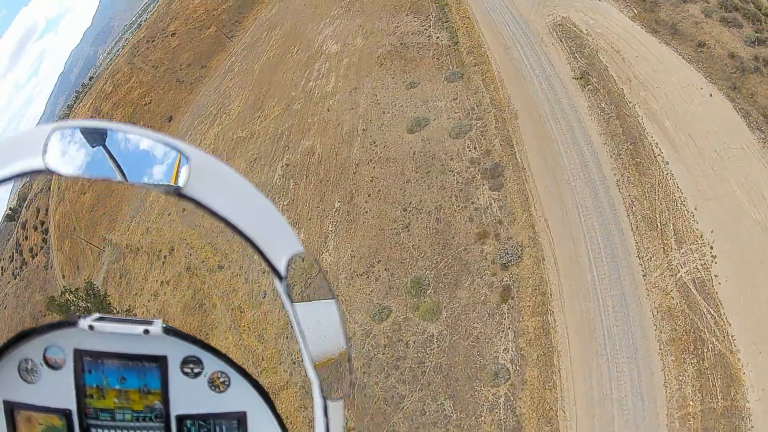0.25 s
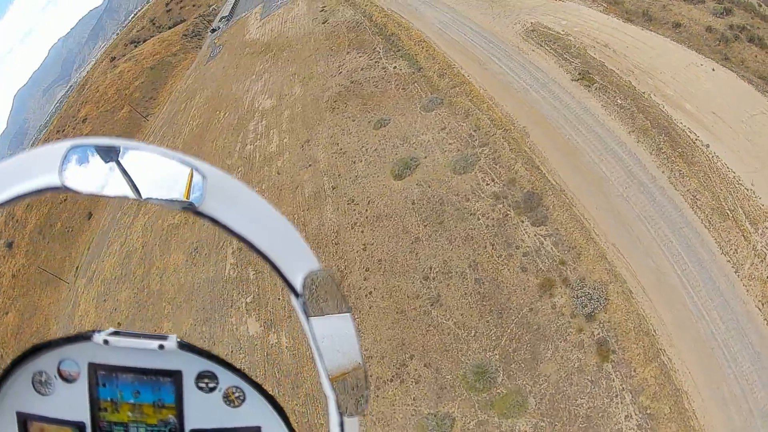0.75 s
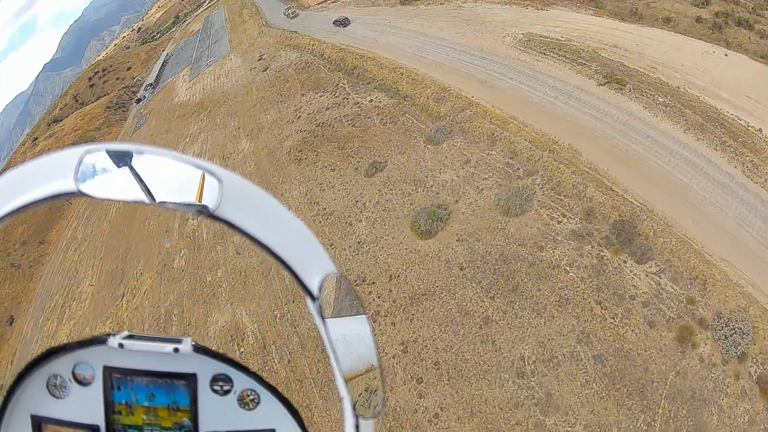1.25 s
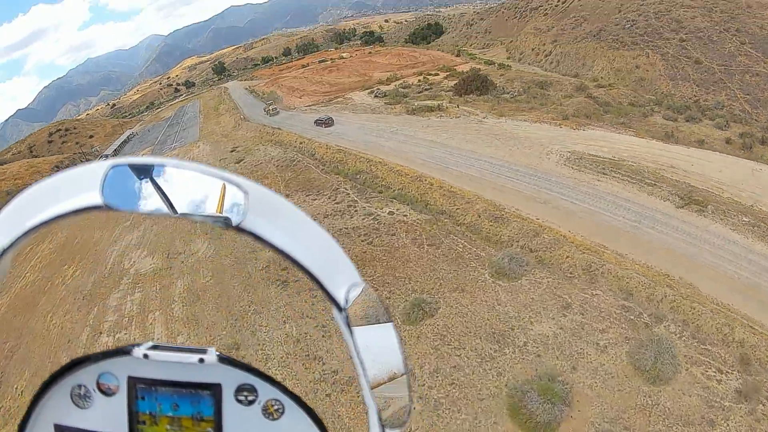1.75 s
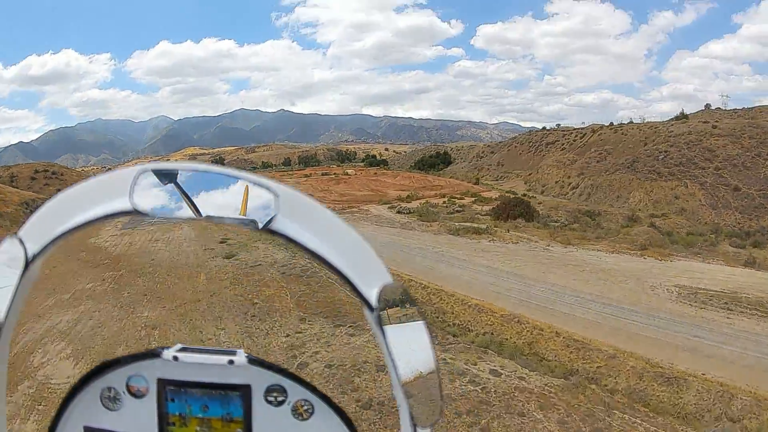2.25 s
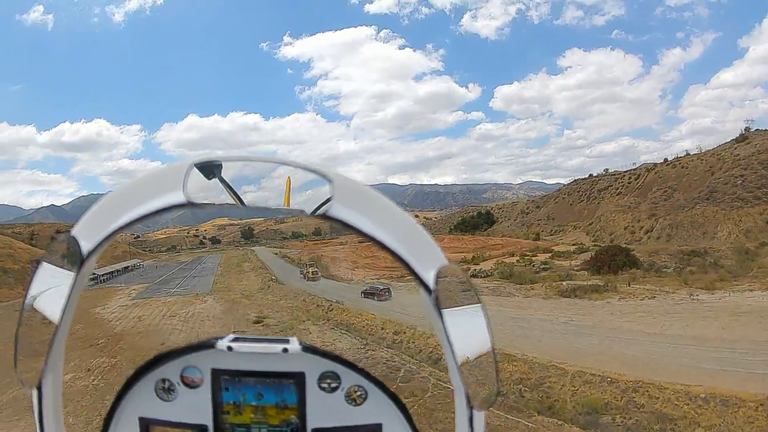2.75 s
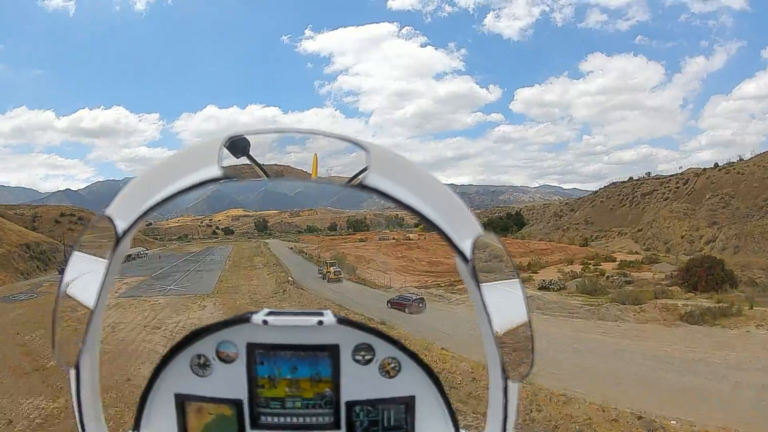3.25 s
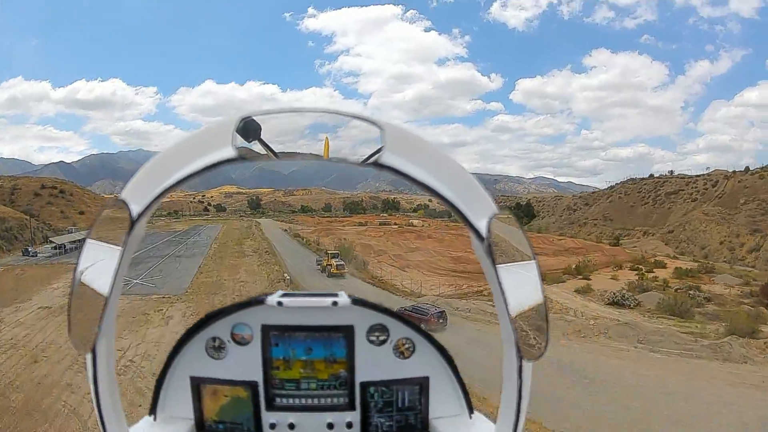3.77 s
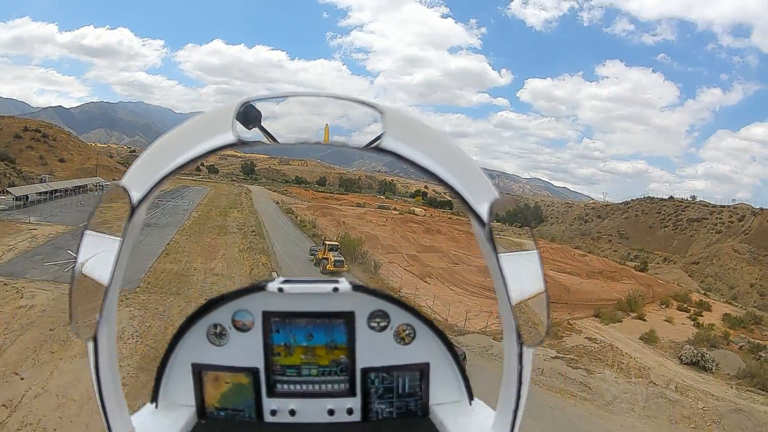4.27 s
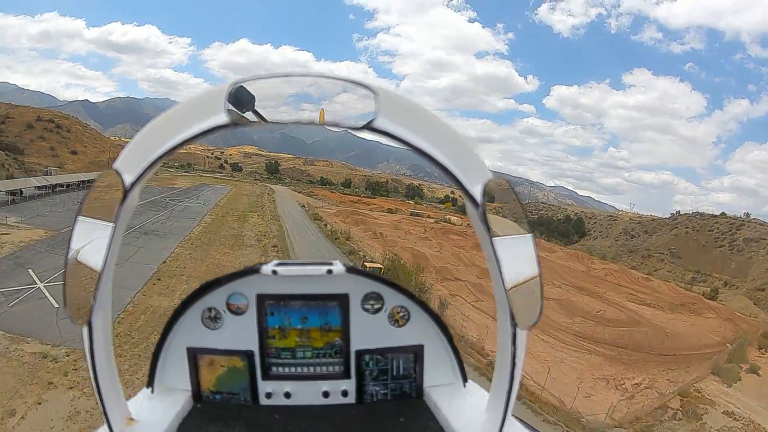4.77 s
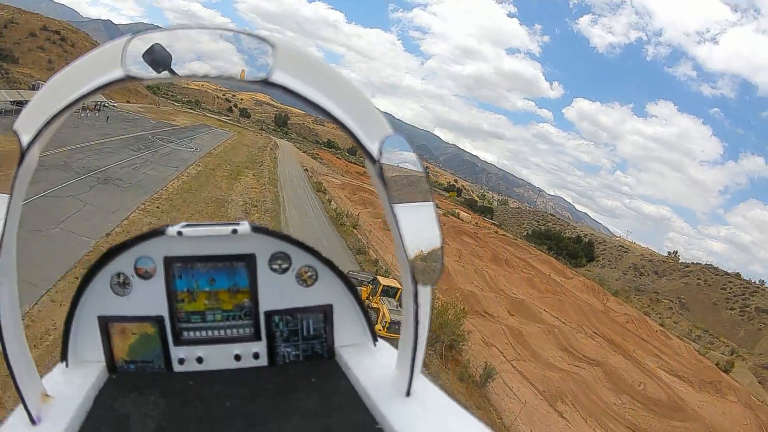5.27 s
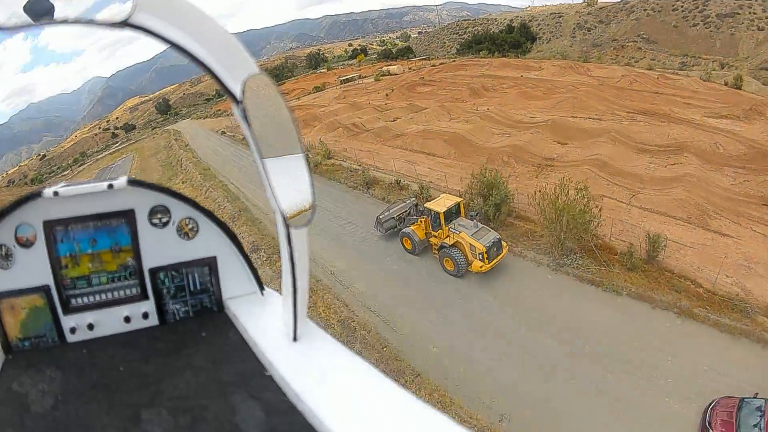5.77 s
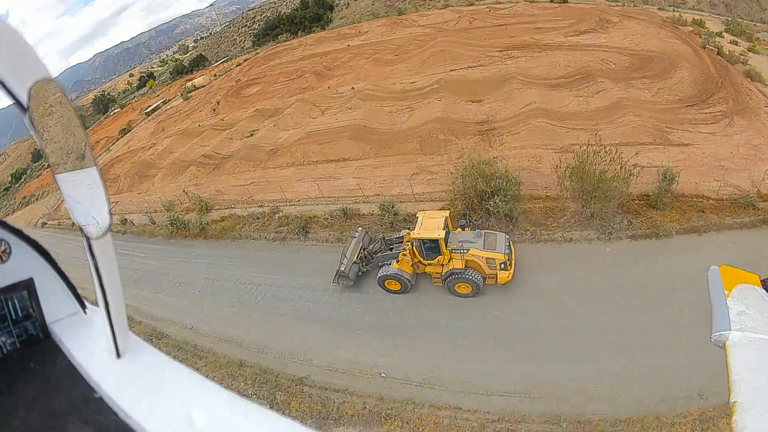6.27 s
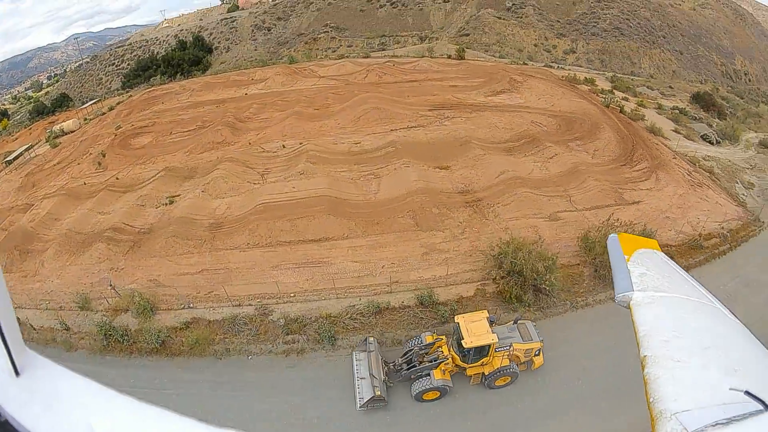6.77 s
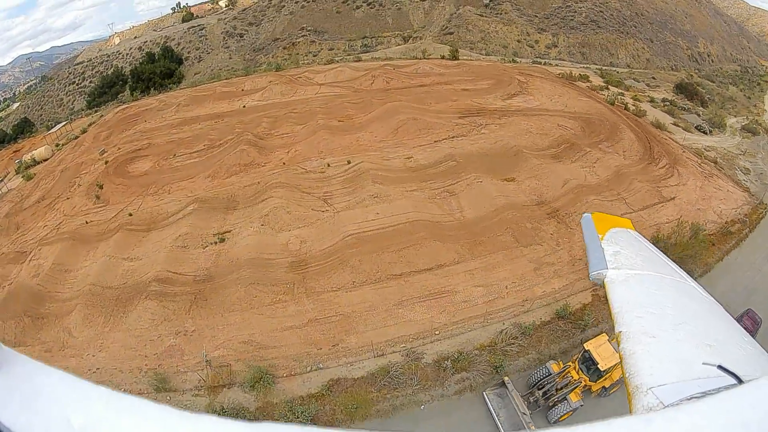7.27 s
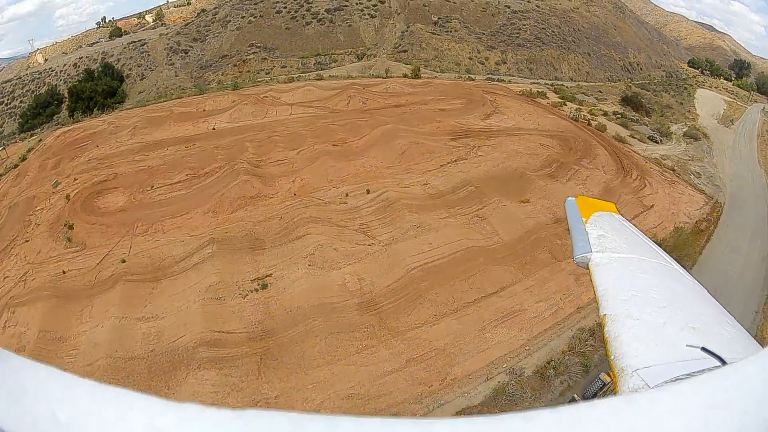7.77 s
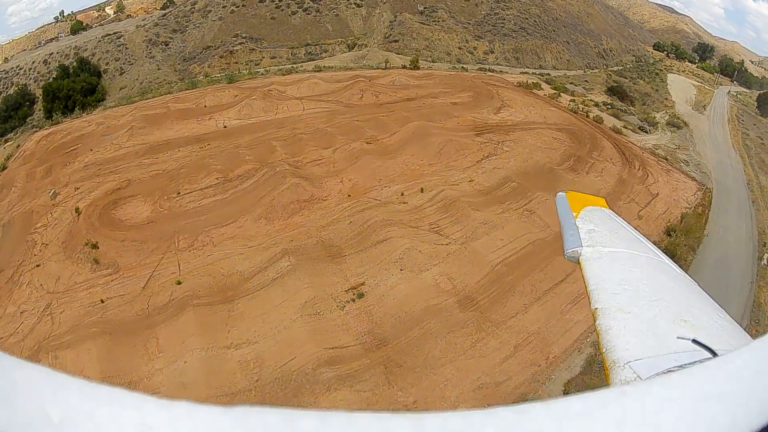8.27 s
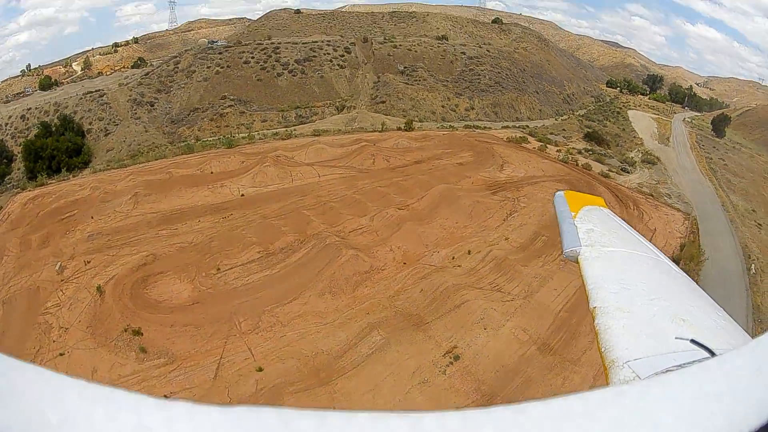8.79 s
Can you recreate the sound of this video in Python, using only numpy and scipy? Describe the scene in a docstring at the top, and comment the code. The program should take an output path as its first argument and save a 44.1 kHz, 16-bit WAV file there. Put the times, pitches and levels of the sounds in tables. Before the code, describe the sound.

A model jet's electric ducted fan is heard in flight from inside the cockpit: a steady mid-pitched hum with a faint high whine above it. Air rushes past throughout, with low buffeting and a thin hiss. The pitch holds for about 1.5 seconds, then creeps upward until 3 seconds, with a slight dip near 3.8. A loose part gives faint, scattered ticks from about 2.5 seconds, mostly between 4 and 5. At around 5 seconds the throttle eases and the pitch falls, lowest near 5.5. It sweeps back up by 6.2 seconds, and the fan grows louder, stepping higher again just after 7. From about 7.5 seconds a light, sputtering, buzzy rattle joins the brighter tone. The pitch rises once more at the end, around 9 seconds, as the rattle fades.

```python
"""Ducted-fan model jet, from the cockpit.

In flight, the electric fan's unbalanced rotor hums through the foam airframe at shaft rate.
Nine blades whine faintly above it. Air rushes past the fuselage and through the duct.
A loose part ticks in brief flurries, then once per turn at high throttle."""
import sys
import numpy as np
from scipy import signal
from scipy.fft import rfft, irfft, next_fast_len
from scipy.io import wavfile
from scipy.ndimage import uniform_filter1d

SR = 44100
rng = np.random.default_rng(int(sys.argv[2]) if len(sys.argv) > 2 else 0)


def put_to_file(sound):
    """Save the sound as 16-bit audio at rate SR, in the file named by the first command-line argument."""
    columns = np.atleast_2d(sound).T  # one column per channel
    safe = np.clip(columns, -1, 1)
    whole_steps = np.round(safe * 32767)
    wavfile.write(sys.argv[1], SR, whole_steps.astype(np.int16))


N = 398223

# Rotor speed: time_s, shaft_hz
SHAFT_SPEED = [(0, 337.5), (.5, 331.7), (1.5, 332.5), (1.75, 344), (2.03, 347), (2.25, 353), (2.7, 360.5),
               (3.0, 362.8), (3.65, 363.2), (3.78, 352.5), (3.95, 352.5), (4.17, 359), (4.5, 363.8),
               (4.87, 364), (5.13, 316), (5.27, 303), (5.45, 298), (5.58, 300.8), (5.75, 312), (5.95, 331),
               (6.11, 361), (6.31, 370.5), (6.71, 376), (7.05, 379), (7.23, 396), (7.35, 398),
               (7.52, 406.5), (8.45, 407.8), (8.8, 412), (9.03, 435)]
# Hum at shaft orders 1-3: time_s, first_db, second_db, third_db
HUM_LEVELS = [(0, -41.5, -67, -73), (.3, -40, -69, -65), (1.25, -42.5, -66.5, -61.5), (2.1, -42, -64, -70),
              (2.9, -42, -60, -75), (3.35, -41.5, -60.5, -72), (3.52, -38, -68, -73),
              (3.9, -41, -64, -67.5), (4.2, -37.5, -74.5, -69.5), (4.85, -38, -74, -60.5),
              (4.97, -42, -68, -70), (5.06, -40, -71, -70), (5.2, -43.5, -67, -62.5),
              (5.7, -45.5, -71, -66), (5.85, -41, -66, -71), (6.03, -43.5, -67.5, -71),
              (6.3, -38, -60, -67), (6.7, -35, -55, -65), (7.07, -35, -56, -62.5), (7.25, -34, -51, -60),
              (7.55, -34.2, -47.5, -57.5), (8.2, -34, -47.5, -56.5), (8.35, -34.4, -50, -60),
              (8.5, -34.4, -47, -57), (8.8, -34.5, -46.5, -57.5), (9.03, -37, -45.5, -69)]
# Upper shaft orders: order, free_db, full_rattle_db
UPPER_ORDERS = [(4, -72, -66.5), (5, -82, -70), (6, -81.5, -82), (7, -87.5, -71.5), (8, -90, -75),
                (10, -89.5, -75.5), (11, -94.5, -83.5), (12, -99, -90)]
# Airframe response to the free-running upper orders: frequency_hz, gain_db
AIRFRAME_RESPONSE = [(1200, -4.5), (1600, -4), (2000, -3.5), (2260, 3.5), (2500, 0), (2900, 4),
                     (3300, -3.5), (3760, 6), (4100, 5.5), (4800, -1)]
# Blade-pass harmonics 1-3: time_s, first_db, second_db, third_db
BLADE_LEVELS = [(0, -72, -96, -95), (.3, -74, -92, -92), (.5, -80, -91, -98), (1.4, -73.5, -91, -96),
                (1.75, -73, -85, -100), (2.6, -83, -95, -97), (3.1, -75.5, -87, -80), (3.45, -78, -84, -86),
                (3.7, -80, -95, -97), (4.2, -81.5, -95, -85), (4.8, -72.5, -86, -90), (5.1, -84, -96, -105),
                (5.4, -84, -97, -104), (5.85, -87, -99, -99), (6.15, -73, -91, -95), (6.7, -74, -86, -100),
                (7.4, -75.5, -99, -104), (7.95, -86, -93, -104), (8.23, -82, -92, -104),
                (8.3, -69, -90, -104), (8.42, -73, -92, -104), (8.52, -89, -92, -104),
                (8.8, -72, -92, -104), (9.03, -63.5, -90, -104)]
# Slipstream: time_s, buffet_db, rush_db, inlet_db
AIR_LEVELS = [(0, -52, -55, -71), (.5, -52, -56, -74.5), (.9, -53.5, -56.5, -72), (1.9, -52.5, -55.5, -71),
              (2.7, -51.5, -54.5, -69.5), (3.6, -53.5, -56, -68), (4.3, -56, -57.5, -69.5),
              (4.75, -53.5, -56.5, -68), (5.15, -55, -58.5, -73), (5.5, -55, -58.5, -75),
              (6.15, -50.5, -56.5, -70.5), (6.8, -56, -57, -68.5), (7.03, -55.5, -58, -73),
              (7.6, -54.5, -56, -67), (8.1, -59, -57.5, -67), (9.03, -56.5, -57, -66)]
# Canopy buffet: frequency_hz, relative_db
BUFFET_SPECTRUM = [(11, -48.5), (18, -9.5), (43, -1), (91, 0.5), (187, -2), (258, -5.5), (267, -6),
                   (280, -10), (360, -11), (620, -120)]
# Fuselage rush: frequency_hz, relative_db
RUSH_SPECTRUM = [(200, -13), (300, 2), (450, 1), (600, -5), (900, -6), (1200, -5), (1500, -6), (1900, -12),
                 (2170, -16.5), (2380, -11), (2600, -17), (2900, -21), (3500, -31), (4500, -32)]
# Inlet hiss: frequency_hz, relative_db
INLET_SPECTRUM = [(2200, -10), (3000, 0.5), (4200, -0.5), (4500, -1.5), (4800, -5.5), (5200, -3.5),
                  (5500, -8.5), (5900, -15.5)]
# Duct hiss: frequency_hz, relative_db
DUCT_SPECTRUM = [(4800, -20.5), (5600, -8), (6400, 0), (7000, -10), (7600, -3), (8400, -0.7), (9200, -5),
                 (9800, 0), (10300, -9), (11500, -16.5), (13000, -16.5), (15000, -19), (16000, -16)]
# Loose part's modes: pitch_hz, width_hz, gain_db, polarity
PART_MODES = [(1900, 280, 15.5, 1), (4370, 680, 5.5, -1), (5600, 220, 6, -1), (6350, 570, 13.5, 1),
              (7300, 1100, 8.5, -1), (8100, 350, 7, 1), (10000, 530, 0.5, 1), (10900, 1000, -3, 1),
              (12400, 1500, -6, 1), (12900, 900, -5, 1), (14300, 1200, -12.5, 1), (15400, 480, -4, -1)]
# Flurries of light touches: start_s, peak_db
FLURRIES = [(2.4812, -66), (2.5914, -67), (3.6094, -69), (4.0824, -60), (4.2294, -63), (4.5544, -67),
            (4.595, -59), (4.6994, -58), (4.7294, -65), (4.7894, -68), (4.9457, -66), (5.6786, -64)]
# Once-per-turn rattle: time_s, level_db
RATTLE_LEVELS = [(7.3, -100), (7.52, -68), (7.55, -66), (7.7, -58), (8.04, -59), (8.07, -63), (8.23, -59.5),
                 (8.3, -69), (8.41, -65.5), (8.46, -58.5), (8.57, -61.5), (8.75, -58.5), (8.88, -59.5),
                 (8.97, -68), (9.03, -72)]


def from_db(db):
    """dB to gain."""
    return 10 ** (np.asarray(db) / 20)


def unit_rms(x):
    """Scale to rms 1."""
    return x / np.sqrt(np.mean(x ** 2) + 1e-20)


def curves(table):
    """One per-sample curve for each column after time_s."""
    time_s, *columns = np.transpose(table)
    return [np.interp(np.arange(N) / SR, time_s, column) for column in columns]


def drift(rate_hz):
    """Slow random wander, rms 1: noise through two one-pole low-passes."""
    hop, settle = 40, 2000
    pole = np.exp(-2 * np.pi * hop * rate_hz / SR)
    white = rng.standard_normal(N // hop + settle + 2)
    slow = signal.lfilter([1], [1, -2 * pole, pole * pole], white)[settle:]
    return np.interp(np.arange(N) / hop, np.arange(len(slow)), unit_rms(slow))


def shaft_tone(turns, order, level_db, waver_db):
    """One multiple of the shaft rate; its rms level wavers."""
    return np.sqrt(2) * from_db(level_db + waver_db * drift(16)) * np.cos(2 * np.pi * order * turns)


def rotor_hum(turns, shaft_hz, full_rattle_db=-60, rattle_share=0.46):
    """Unbalance shakes the airframe; upper orders rise with the loose part's rattle."""
    first_db, second_db, third_db = curves(HUM_LEVELS)
    hum = shaft_tone(turns, 1, first_db, waver_db=0.5)
    hum -= shaft_tone(turns, 2, second_db, waver_db=1.0)   # flattens crests, sharpens troughs
    hum += shaft_tone(turns + rng.random(), 3, third_db, waver_db=1.6)
    swing_db = rattle_share * (curves(RATTLE_LEVELS)[0] - full_rattle_db)
    for order, free_db, rattling_db in UPPER_ORDERS:
        airframe_db = np.interp(order * shaft_hz, *np.transpose(AIRFRAME_RESPONSE))
        running_db = free_db + airframe_db + 2.5 * drift(0.6)
        hum += shaft_tone(turns, order, np.maximum(running_db, rattling_db + swing_db), waver_db=2.5)
    return hum


def blade_whine(turns, blades=9):
    """Each blade passes the stators on every turn."""
    return sum(shaft_tone(turns, blades * harmonic, level_db, waver_db=1.0)
               for harmonic, level_db in enumerate(curves(BLADE_LEVELS), start=1))


def flow_noise(spectrum, flicker_db, flicker_hz):
    """Shaped noise with a flickering level, rms 1."""
    hz, db = np.transpose(spectrum)
    size = next_fast_len(N)
    bins_hz = np.arange(size // 2 + 1) * SR / size + 1e-3
    shape = from_db(np.interp(np.log(bins_hz), np.log(hz), db, left=-90, right=-90))
    noise = irfft(rfft(rng.standard_normal(size)) * shape, size)[:N]
    return unit_rms(noise * from_db(flicker_db * drift(flicker_hz)))


def airflow(turns, shaft_hz, cruise_hz=360, duct_cruise_db=-74.5, duct_db_per_octave=44.5):
    """Air buffets the canopy and rushes along the fuselage; inlet and duct hiss swell once per turn."""
    buffet_db, rush_db, inlet_db = curves(AIR_LEVELS)
    octaves = np.log2(shaft_hz / cruise_hz)
    duct_db = np.clip(duct_cruise_db + duct_db_per_octave * octaves, -82, -73.5) + 0.4 * drift(3.5)
    swell = np.cos(2 * np.pi * turns)
    buffet = from_db(buffet_db) * flow_noise(BUFFET_SPECTRUM, flicker_db=0.74, flicker_hz=1.1)
    rush = from_db(rush_db) * flow_noise(RUSH_SPECTRUM, flicker_db=0.46, flicker_hz=30)
    inlet = from_db(inlet_db + 0.66 * swell) * flow_noise(INLET_SPECTRUM, flicker_db=0.5, flicker_hz=8)
    duct = from_db(duct_db + swell) * flow_noise(DUCT_SPECTRUM, flicker_db=0.7, flicker_hz=15)
    return buffet + rush + inlet + duct


def resonance(x, pitch_hz, width_hz):
    """Two-pole band-pass, peak gain 1."""
    radius = np.exp(-np.pi * width_hz / SR)
    feedback = [1, -2 * radius * np.cos(2 * np.pi * pitch_hz / SR), radius * radius]
    return signal.lfilter(np.array([1, 0, -1]) * (1 - radius * radius) / 2, feedback, x)


def part_ring(clicks):
    """Clicks ring the loose part's broad modes; neighbours of equal polarity leave a dip between them."""
    return sum(polarity * from_db(gain_db) * resonance(clicks, pitch_hz, width_hz)
               for pitch_hz, width_hz, gain_db, polarity in PART_MODES)


def part_flurries(touch_count=5, gap_s=0.0025, uneven_db=4):
    """At lower speed the loose part touches only in brief, uneven flurries."""
    start_s, peak_db = np.transpose(FLURRIES)
    scatter = rng.standard_normal((len(start_s), touch_count, 2))
    touch_s = start_s[:, None] + gap_s * (np.arange(touch_count) + 0.24 * scatter[..., 0])
    touches = np.full(N, 1e-18)
    touches[(touch_s * SR).astype(int)] = from_db(peak_db[:, None] - uneven_db * abs(scatter[..., 1]))
    ring = part_ring(signal.lfilter([1, -0.8], [1], touches))   # a light touch is brighter
    return ring * (touches.max() / abs(ring).max())


def part_rattle(turns, contact_phase_turns=0.76, uneven_db=2.54, sputter_db=1.2, sputter_hz=24):
    """At high throttle the loose part strikes once per turn, uneven in timing and strength."""
    hits = np.flatnonzero(np.diff(np.floor(turns - contact_phase_turns)) > 0)
    scatter = rng.standard_normal((len(hits), 2))
    jitter_s = 1.5e-5 * scatter[:, 0] + 2.5e-5 * drift(35)[hits]
    hits = np.clip(hits + np.round(jitter_s * SR).astype(int), 0, N - 1)
    dip_db = sputter_db * drift(sputter_hz)[hits] ** 2   # contact comes and goes
    contacts = np.full(N, 1e-18)
    contacts[hits] = from_db(uneven_db * scatter[:, 1] - dip_db)
    return from_db(curves(RATTLE_LEVELS)[0]) * unit_rms(part_ring(contacts))


def scene():
    """Rotor, blades, loose part and air, mono. Inertia smooths the shaft speed, which hunts slightly."""
    inertia_s, hunt_hz = 0.065, 0.25
    shaft_hz = uniform_filter1d(curves(SHAFT_SPEED)[0], int(inertia_s * SR) + 1, mode="nearest")
    turns = np.cumsum(shaft_hz + hunt_hz * drift(12)) / SR
    fan = rotor_hum(turns, shaft_hz) + blade_whine(turns)
    loose_part = part_rattle(turns) + part_flurries()
    return (fan + loose_part + airflow(turns, shaft_hz))[None]


def record(dry):
    """Microphone hiss, then a steep low-pass."""
    hiss_db, cutoff_hz = -85.5, 15700
    heard = dry + from_db(hiss_db) * rng.standard_normal(dry.shape)
    return signal.sosfilt(signal.ellip(12, 0.3, 70, cutoff_hz, fs=SR, output="sos"), heard)


dry = scene()
out = record(dry)
put_to_file(out)
```